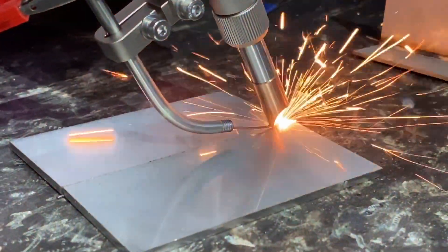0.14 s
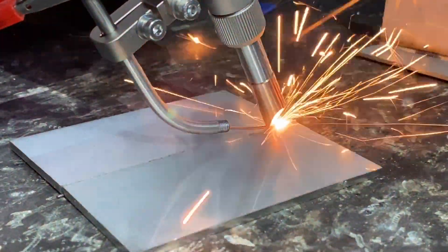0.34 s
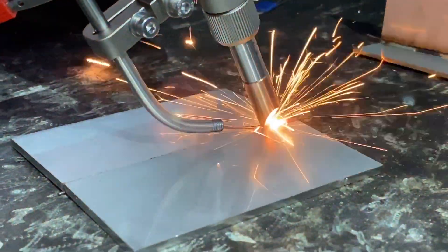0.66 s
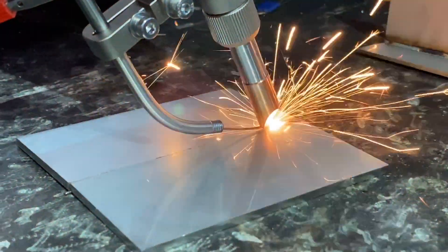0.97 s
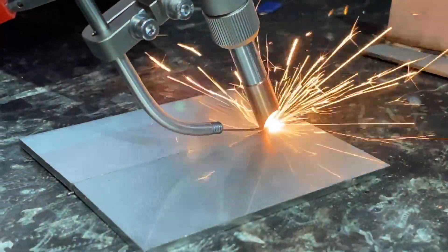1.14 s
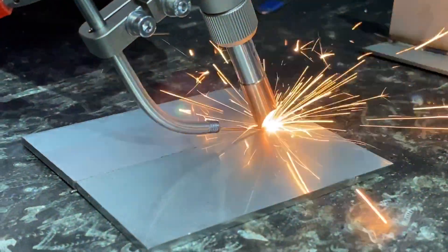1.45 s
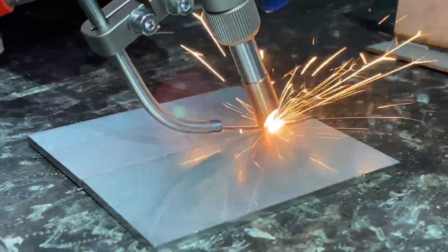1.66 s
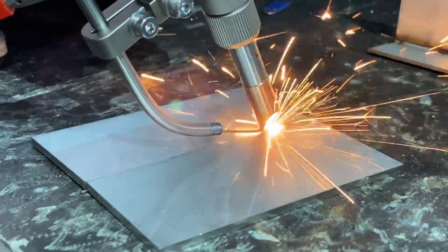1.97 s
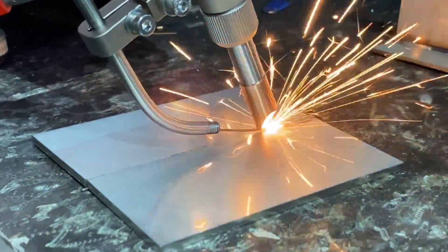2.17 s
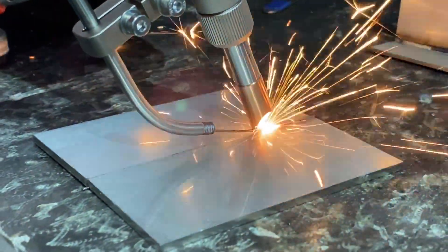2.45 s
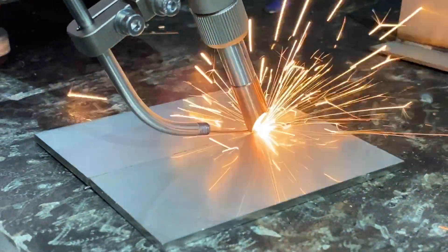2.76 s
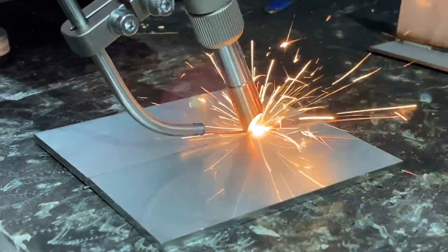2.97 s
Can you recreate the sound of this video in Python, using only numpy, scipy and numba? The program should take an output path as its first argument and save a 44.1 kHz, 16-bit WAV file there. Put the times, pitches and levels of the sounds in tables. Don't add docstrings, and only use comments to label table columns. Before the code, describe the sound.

A laser welding head hisses coarsely and steadily, with a low buzz and faint fan hum beneath.

```python
import sys
import numpy as np
from scipy import signal
from scipy.fft import rfft, irfft
from scipy.io import wavfile
from scipy.ndimage import uniform_filter1d
from numba import njit

SR = 44100
rng = np.random.default_rng(int(sys.argv[2]) if len(sys.argv) > 2 else 0)


def voltage_ratio(level):
    return 10 ** (np.asarray(level, float) / 20)


def digitize_waveform(pressure):
    field = np.atleast_2d(pressure).T
    bounded = np.clip(field, -1, 1)
    quanta = np.round(bounded * 32767).astype(np.int16)
    wavfile.write(sys.argv[1], SR, quanta)


N = 137151


@njit
def moving_bandpass(x, hz, width_hz):
    y, band, low = np.empty(len(x)), 0., 0.
    for i in range(len(x)):
        g = np.tan(np.pi * hz[i] / SR)
        k = width_hz / hz[i]
        v = (band + g * (x[i] - low)) / (1 + g * (g + k))
        band = 2 * v - band
        low = low + 2 * g * v
        y[i] = k * v
    return y


def unit(x):
    return x / np.sqrt(np.mean(x ** 2))


def walk(rate_hz):
    hold = int(SR / rate_hz)
    steps = np.repeat(rng.standard_normal(N // hold + 1), hold)
    return unit(uniform_filter1d(uniform_filter1d(steps, hold), hold)[:N])


def curve(table, col):
    rows = np.array(table)
    return np.interp(np.arange(N) / SR, rows[:, 0], rows[:, col])


def colour(x, table):
    rows = np.array(table)
    hz = np.fft.rfftfreq(N, 1 / SR)
    db = np.interp(np.log(hz + 1), np.log(rows[:, 0]), rows[:, 1])
    return irfft(rfft(x) * voltage_ratio(db), N)


def turbulence(hz, width_hz):
    hz = hz * (1 + .004 * walk(4.97))
    x = moving_bandpass(rng.standard_normal(N), hz, 1. * width_hz)
    x = moving_bandpass(x, hz, 2. * width_hz)
    flicker_db = .3 * walk(6.05)
    flutter_db = 1.1 * walk(39.84)
    return unit(x) * voltage_ratio(flicker_db + flutter_db)


# start_hz, end_hz [at end of travel], width_hz, start_db, end_db
NOZZLE_MODES = [(2404, 2223, 573, -7, -14), (3294, 2890, 690, -14, -12), (3670, 3483, 585, -3.5, -8.5),
                (4440, 4470, 620, -16, -11), (5160, 5085, 430, -8, -10.5), (5700, 5640, 550, -7.5, -8.5),
                (6784, 6420, 780, -2.5, -3.5), (7245, 7060, 470, -1.5, -5.5), (8300, 7800, 650, -8, -7.5),
                (8530, 8090, 450, -1, -4.5), (9120, 9270, 380, -6.5, -5), (10080, 9790, 520, -8.5, 0),
                (10740, 10920, 443, -0.5, -0.5)]


def nozzle_hiss(travel):
    hiss = 0
    for start_hz, end_hz, width_hz, start_db, end_db in NOZZLE_MODES:
        hz = start_hz + (end_hz - start_hz) * travel
        level = voltage_ratio(start_db + (end_db - start_db) * travel)
        hiss = hiss + turbulence(hz, width_hz) * np.sqrt(width_hz) * level
    return hiss


# start_hz, end_hz [at end of travel], width_hz, depth [0-1]
SHEET_NOTCHES = [(2665, 2540, 200, 0.66), (4670, 3660, 214, .95), (4170, 4650, 72, 0.4),
                 (5410, 5300, 86, 0.8), (7830, 7550, 120, 0.3), (9490, 9380, 160, 0.5),
                 (8700, 8900, 110, 0.5), (9900, 18000, 67, 0)]


def sheet_echo(hiss, travel):
    for start_hz, end_hz, width_hz, depth in SHEET_NOTCHES:
        drift = .025 * 4000 / start_hz * walk(4)
        hz = (start_hz + (end_hz - start_hz) * travel) * (1 + drift)
        hiss = hiss - depth * moving_bandpass(hiss, hz, 1. * width_hz)
    return hiss


# time_s, level_db
RIM_LEVEL = [
    (0, -78),
    (.6, -59),
    (.9, -55),
    (1.3, -43),
    (2.0, -42.5),
    (2.5, -49),
    (3.11, -66),
]


def rim_whistle():
    return turbulence(np.full(N, 11550.), 600) * voltage_ratio(curve(RIM_LEVEL, col=1))


# time_s, level_db [of the jet], travel [0-1, of the head]
WELD_COURSE = [(0, -32.5, 0), (.3, -32, 0.14), (.8, -33.5, 0.27), (1.1, -33.5, 0.4), (1.4, -33.5, 0.56),
               (1.54, -33, 0.55), (1.61, -35, 0.67), (1.8, -33, 0.72), (2.1, -34, 0.75), (2.5, -35, 0.81),
               (2.8, -34.5, 0.81), (3.11, -34.5, 0.8)]


def jet(travel, swing):
    hiss = sheet_echo(nozzle_hiss(travel), travel)
    hiss = hiss / uniform_filter1d(np.abs(hiss), SR // 2) * 0.81
    hiss = hiss * voltage_ratio(curve(WELD_COURSE, col=1) + 1.5) + rim_whistle()
    chop_shape = np.cos(2 * swing) + .6 * np.cos(swing) + .7 * np.cos(3 * swing) + .5 * np.cos(4 * swing)
    shared_db = .4 * walk(14)
    return hiss * (1 + .07 * chop_shape) * voltage_ratio(shared_db)


# start_hz, end_hz [at end of travel], left_lead_rad
PORT_LAG = [(100, 100, 0), (3300, 3300, .1), (6700, 7300, -.05), (7500, 7750, -1.0), (8400, 8600, -3.14),
            (9100, 9050, -4.9), (9850, 9800, -6.2), (10350, 10400, -6.5), (10850, 10900, -7.4),
            (11600, 11700, -9.42), (12500, 12500, -9.5)]


def ports(x, travel):
    hz = np.fft.rfftfreq(N, 1 / SR)
    start_hz, end_hz, lead = np.array(PORT_LAG).T
    spectrum = rfft(x)

    def heard(lag_hz):
        return irfft(spectrum * np.exp(np.outer([.5j, -.5j], np.interp(hz, lag_hz, lead))), N)

    start, end = heard(start_hz), heard(end_hz)
    return start + (end - start) * travel


# frequency_hz, level_db
ROOM_AIR = [(1700, -12), (2200, -20), (3300, -17), (4300, -18), (5500, -26), (7200, -17), (8500, -13),
            (10000, -20)]


def room_hiss(travel, swing):
    return colour(jet(travel, swing), ROOM_AIR)


# multiple [of the swing rate], level_db [rms]
BEAM_PARTIALS = [(1, -70), (2, -61), (3, -57), (4, -59), (5, -61), (6, -64.5), (7, -65.5), (8, -63),
                 (9, -65), (10, -68), (11, -77.5), (13, -69), (17, -82.5), (18, -69.5)]


def buzz(swing):
    out = 0
    for multiple, db in BEAM_PARTIALS:
        level = np.sqrt(2) * voltage_ratio(db + 1.2 * walk(5))
        out = out + level * np.cos(multiple * swing + .25 * walk(9))
    return out


# pitch_hz, level_db [rms], waver_db
MACHINE_TONES = [(49, -56, 1), (72.4, -62.5, 2.5), (89.4, -64, -3.5), (101.4, -73, 4.5), (200, -61, -1.5),
                 (300.1, -56.5, 0), (400, -70, 0.5), (532, -73.5, 4), (870, -79, -2), (1238, -73, -2.5)]


def hum():
    t = np.arange(N) / SR
    out = 0
    for hz, db, waver_db in MACHINE_TONES:
        level = np.sqrt(2) * voltage_ratio(db + waver_db * walk(5.3))
        out = out + level * np.sin(2 * np.pi * (hz * t + rng.random()))
    return out


# frequency_hz, level_db [per Hz]
SHOP_SPECTRUM = [(25, -17), (45, 0), (90, -1), (150, -8), (400, -10.5), (900, -9), (1500, -12),
                 (3000, -28.5)]


def shop():
    return unit(colour(rng.standard_normal(N), SHOP_SPECTRUM)) * voltage_ratio(-53 + .3 * walk(8))


def scene():
    travel = np.clip(curve(WELD_COURSE, col=2), 0, 1)
    swing_hz = 93.2 * (1 + .0025 * walk(3))
    swing = 2 * np.pi * np.cumsum(swing_hz) / SR
    direct = ports(jet(travel, swing), travel)
    machines = buzz(swing) + hum() + shop()
    lean_db, shop_side_db = 1.26, -14.5
    apart = (voltage_ratio(lean_db) - 1) * machines + voltage_ratio(shop_side_db) * shop()
    apart = signal.sosfilt(signal.butter(2, 100, "high", fs=SR, output="sos"), apart)
    sides = np.array([[1], [-1]])
    return direct + machines + (apart + room_hiss(travel, swing)) * sides


# frequency_hz, limit_db [against the neighbourhood]
WEAK_LIMIT = [(300, -24), (1000, -14), (1700, -18), (2300, -12), (3300, -14), (4500, -10.5), (6500, -9),
              (12000, -10)]


def thin_weak_bands(x):
    window = signal.windows.kaiser_bessel_derived(2048, 4 * np.pi)
    grid = dict(window=window, nperseg=2048, noverlap=1024)
    offset = 608
    mid_side = np.pad([x[0] + x[1], x[0] - x[1]], ((0, 0), (offset, 0)))
    hz, _, z = signal.stft(mid_side, SR, **grid)
    power = np.abs(z) ** 2
    around = uniform_filter1d(uniform_filter1d(power.sum(0), size=61, axis=0), size=5, axis=1)
    sway_db = 4.0 * 3 * uniform_filter1d(rng.standard_normal(z.shape[1:]), size=61, axis=0)
    limit_db = np.interp(hz, *np.array(WEAK_LIMIT).T)[:, None] + sway_db
    quiet = voltage_ratio(2 * -72) * (hz[:, None] > 11000)
    keep = uniform_filter1d(power, size=8, axis=1) > around * voltage_ratio(limit_db) ** 2 + quiet
    mid, side = signal.istft(z * keep, SR, **grid)[1][:, offset:offset + N] / 2
    return np.array([mid + side, mid - side])


def band_limit(x):
    return signal.sosfilt(signal.butter(12, 12320, fs=SR, output="sos"), x)


def record(dry):
    top_cut = signal.ellip(8, .5, 60, 12050, fs=SR, output="sos")
    mix = thin_weak_bands(signal.sosfilt(top_cut, dry))
    return band_limit(mix)


dry = scene()
out = record(dry)
digitize_waveform(out)
```